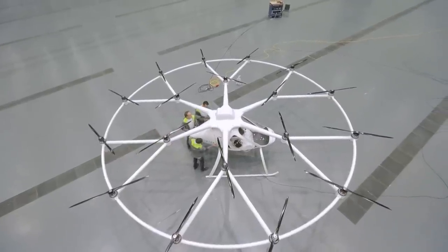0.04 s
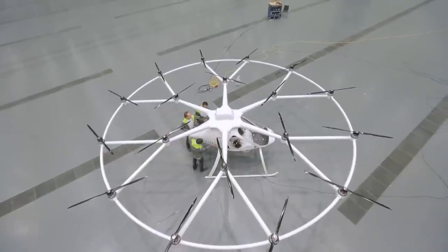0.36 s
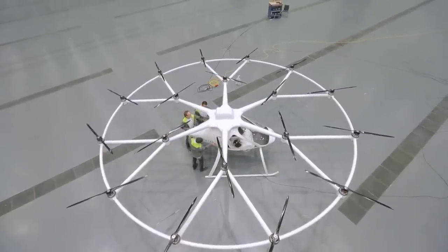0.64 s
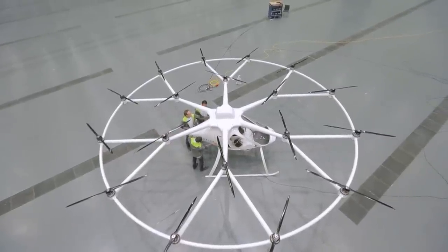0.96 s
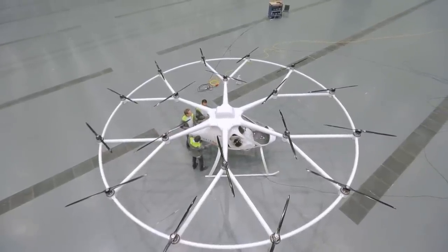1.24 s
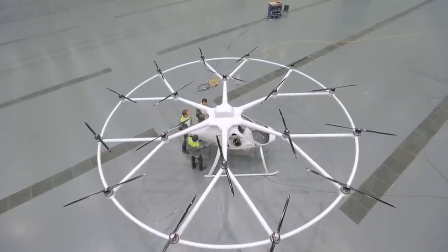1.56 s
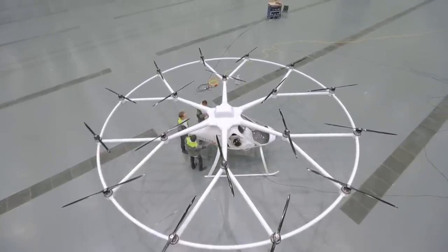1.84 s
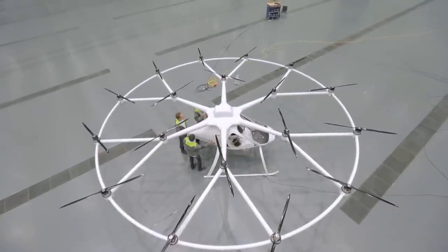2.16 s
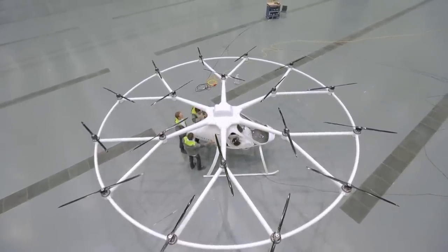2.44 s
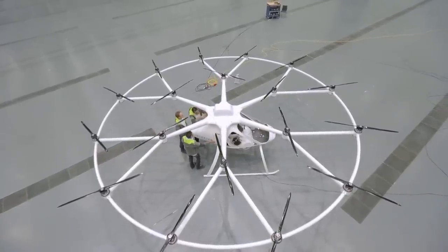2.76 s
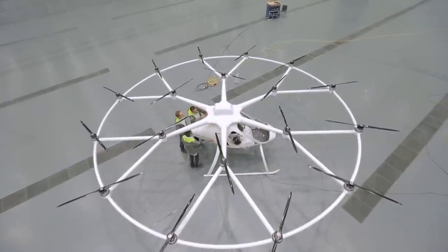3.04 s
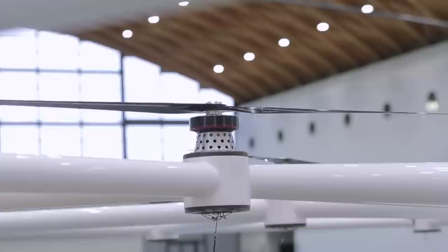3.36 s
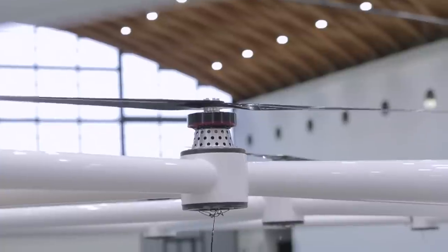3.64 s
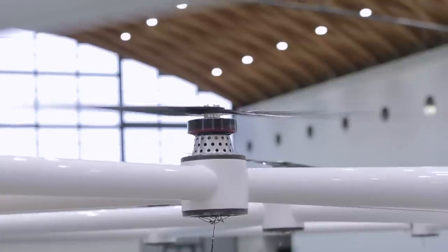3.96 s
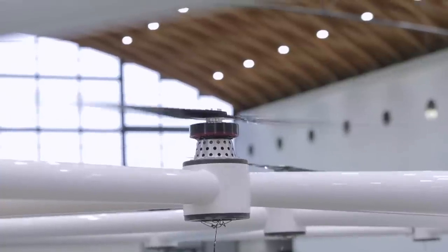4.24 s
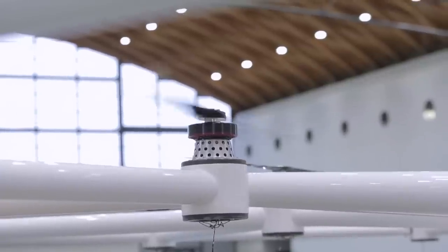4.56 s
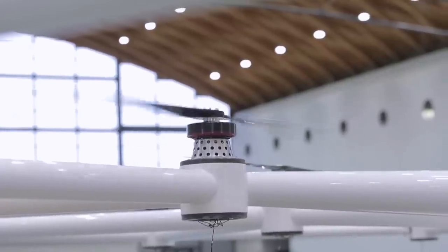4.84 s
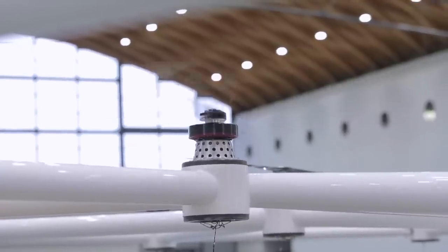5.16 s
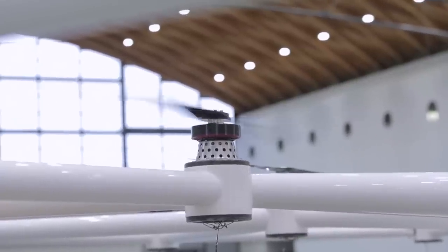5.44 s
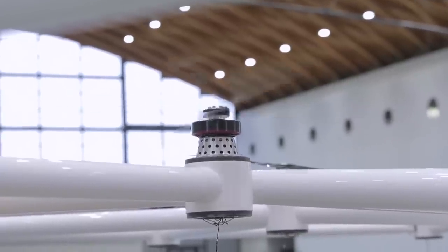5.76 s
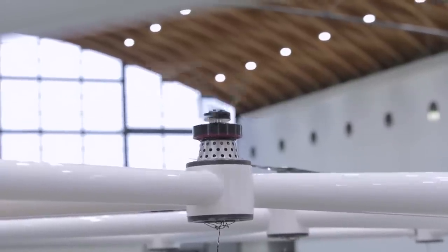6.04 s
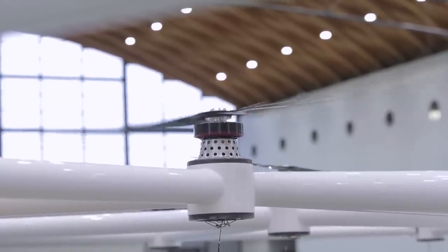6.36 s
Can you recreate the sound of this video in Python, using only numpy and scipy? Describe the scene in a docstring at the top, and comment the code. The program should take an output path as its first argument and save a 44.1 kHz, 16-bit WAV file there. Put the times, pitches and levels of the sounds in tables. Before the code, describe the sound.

A few reverberant knocks over soft ventilation hum, cut off by the loud fluttering rush of a close rotor gaining speed.

```python
"""Three hollow knocks and a few light taps ring out over the ventilation of a big quiet hall, where a
crew works at a parked multicopter: each blow excites the modes of its body, and the hall reverberates.
Then, all at once, the microphone stands in the wash of one rotor that steadily gains speed. Each blade
shoves air and turbulence at it, and the wash swells and eases. Hard blade slaps and vortex buffets
trip a limiter: the whole rush drops at once and climbs back."""
import sys
import numpy as np
from scipy import signal
from scipy.fft import rfft, irfft
from scipy.io import wavfile
from scipy.ndimage import uniform_filter1d

SR = 44100
rng = np.random.default_rng(int(sys.argv[2]) if len(sys.argv) > 2 else 0)


def transcribe(signal):
    """Save signal, clipped to [-1, 1], as a 16-bit WAV file at the path in sys.argv[1]."""
    frames = np.atleast_2d(signal).T
    limited = np.clip(frames, -1, 1)
    pcm = np.round(limited * 32767).astype(np.int16)
    wavfile.write(sys.argv[1], SR, pcm)


N = 290619
T, FREQS = np.arange(N) / SR, np.fft.rfftfreq(N, 1 / SR)
ROTOR_START_S = 3.44

# spectrum of the ventilation: f/Hz, relative density/dB
VENT_SPECTRUM = [(25, -54), (45, -6.5), (65, 4.5), (100, -3), (250, -13), (750, -17), (1000, -12),
                 (1400, -15.5), (2000, -20.5), (2900, -29.5), (5500, -26.5), (7400, -34), (9000, -25),
                 (10800, -43)]
# whine of cooling fans and electronics: f/Hz, level before the swell/dB, bandwidth/Hz
FAN_TONES = [(935, -68.5, 20), (1020, -65.5, 7.6), (1243, -68, 11), (2410, -78, 33), (4920, -78, 41),
             (5580, -76, 37)]
# swell of that whine: t/s, gain/dB
WHINE_SWELL = [(1.0, -3.5), (2.3, -2), (2.8, -3), (3.3, -8.5)]
# reverberation time of the hall: f/Hz, T60/s
HALL_T60 = [(100, 4.5), (300, 3.95), (800, 6.6), (2000, 6.7), (3000, 2.6), (10000, .35)]
# initial spectrum of the reverberant tail: f/Hz, relative density/dB
HALL_COLOUR = [(40, -23), (85, 2.5), (140, 0), (200, -1), (450, 1.5), (1000, -2.5), (2500, -0.5),
               (6000, -15)]
# modes of the hollow body: f/Hz, relative level/dB, T60/s
BODY_MODES = [(136, -2, 0.051), (193, 7.5, 0.04), (264.6, -3, 0.067), (318, -18.5, 0.019),
              (610, -12, 0.015), (1074, -12, 0.18)]
# blows on the body: t/s, thud level/dB, clack level/dB, clack cutoff/Hz, rattle decay time/s
BLOWS = [(.154, -36, -41.5, 2000, .014), (.495, -43.5, -44, 1200, 0.016), (.512, -30.5, -32, 2650, .0095),
         (.605, -48.5, -53, 4500, .011), (.697, -44, -46, 1220, .02), (.755, -30, -38.5, 1240, .022),
         (3.201, -73, -56, 3600, 0.0052)]
# pings of small metal parts: t/s, f/Hz, level/dB, T60/s
METAL_PINGS = [(.603, 2680, -50, .07), (3.202, 2900, -56, .04)]
# strength of the airflow, which drives turbulence and hiss: t/s, relative level/dB
AIRFLOW = [(3.44, -27.5), (3.54, -26.5), (3.9, -29), (4.04, -23), (4.26, -26), (4.36, -27.5), (4.46, -22),
           (4.82, -26.5), (5.04, -29), (5.15, -25), (5.52, -28.5), (5.68, -24), (5.8, -27), (6.12, -26),
           (6.28, -28.5), (6.4, -24.5), (6.59, -24)]
# air tearing past the microphone: f/Hz, relative density/dB
HISS_SPECTRUM = [(1500, -20), (4000, -2), (6000, 4.5), (8500, 5), (11300, 9.5), (13000, 5)]
# turbulence on the microphone: f/Hz, relative density/dB
WAKE_SPECTRUM = [(10, -40), (20, -0.5), (50, 2), (100, -5), (160, -7), (300, -12.5), (650, -15.5),
                 (1300, -21), (2400, -28), (4000, -36.5), (7000, -45.5), (12500, -63)]
# pressure wave of a blade: harmonic of the blade rate, relative level/dB
BLADE_HARMONICS = [(1, 5.5), (2, -5), (3, -24)]
# strength of that wave: t/s, relative level/dB
THROB_LEVEL = [(3.44, -10), (3.5, -14), (3.57, -11), (3.83, -14.5), (3.91, -20), (4.07, -11), (4.2, -13.5),
               (4.35, -12.5), (4.45, -8.5), (4.88, -13), (4.98, -12.5), (5.05, -16), (5.2, -12),
               (5.95, -11), (6.03, -18), (6.12, -10), (6.59, -14.5)]
# crests that slap the microphone extra hard: t/s, added pressure/full scale
BLADE_SLAPS = [(3.844, 0.57), (4.08, 0.21), (4.282, 0.23), (4.75, 1), (5.712, 0.68), (5.962, 0.53),
               (6.149, 0.27)]
# vortices on the microphone: t/s, suction/full scale, rasp level/dB, rasp f/Hz, rasp half-length/s
VORTICES = [(3.547, 0.63, -21, 380, .014), (3.723, 0.5, -18.5, 205, 0.0045), (3.826, 0.15, -23, 343, 0.014),
            (4.404, 0.88, -18.5, 293, 0.013), (4.478, 2.03, -10, 151, .007), (4.995, 0.77, -30, 400, .003),
            (5.067, .05, -22.5, 274, 0.003), (5.163, 0.23, -13, 368, 0.0032),
            (5.308, 0.13, -23.5, 435, 0.021), (5.362, 0.4, -16.5, 372, 0.0028),
            (6.051, 0.57, -25, 187, 0.002), (6.19, 0.67, -21, 212, 0.013), (6.425, 0.088, -22, 430, 0.0073)]


def amp(db):
    """Amplitude ratio of a level in decibels."""
    return 10 ** (np.asarray(db) / 20)


def unit(x):
    """Normalisation to rms 1."""
    return x / np.sqrt(np.mean(x ** 2) + 1e-20)


def read(points, hz):
    """Interpolation on a logarithmic frequency axis."""
    f, value = np.transpose(points)
    return np.interp(np.log(hz + 1), np.log(f + 1), value)


def curve(points):
    """Linear interpolation in time."""
    return np.interp(T, *np.transpose(points))


def add(mix, s, sound):
    """Superposition of a sound beginning at time s."""
    part = mix[max(round(s * SR), 0):][:len(sound)]
    part += sound[:len(part)]


def lowpass(x, hz):
    """Second-order Butterworth low-pass."""
    return signal.sosfilt(signal.butter(2, hz, fs=SR, output="sos"), x)


def band(x, lo_hz, hi_hz):
    """Steep Butterworth band-pass."""
    return signal.sosfilt(signal.butter(4, [lo_hz, hi_hz], "band", fs=SR, output="sos"), x)


def below(x, hz):
    """Zero-phase low-pass."""
    return irfft(rfft(x) / (1 + (FREQS / hz) ** 4), N)


def noise(spectrum):
    """Spectrally shaped Gaussian noise of rms 1."""
    return unit(irfft(rfft(rng.standard_normal(N)) * amp(read(spectrum, FREQS)), N))


def drift(hz):
    """Random fluctuation of rms 1, mostly slower than hz."""
    return unit(below(rng.standard_normal(N), hz))


def ventilation(rumble_db=-54):
    """Broadband flow noise with fan tones, which random modulation widens into narrow bands."""
    fans = np.zeros(N)
    for hz, db, width in FAN_TONES:
        angle = 2 * np.pi * hz * T
        fans += amp(db) * unit(drift(width / 2) * np.cos(angle) + drift(width / 2) * np.sin(angle))
    return amp(rumble_db) * noise(VENT_SPECTRUM) + fans * amp(curve(WHINE_SWELL))


def hall(x, wet_db=-6, boom_db=-52):
    """Reverberation: a diffuse field decays exponentially, and absorption takes the treble first."""
    hz, t, spectra = signal.stft(rng.standard_normal(N), SR, nperseg=512)
    decay_db = read(HALL_COLOUR, hz)[:, None] - 60 * t / read(HALL_T60, hz)[:, None]
    tail = signal.istft(spectra * amp(decay_db), SR, nperseg=512)[1][:N]
    boom = band(lowpass(tail, 400), 58, 2500)  # an earlier blow still hangs in the air
    boom /= np.std(boom[:SR // 4])
    tail *= np.sqrt(2000 / SR) / np.linalg.norm(lowpass(tail, 1000))  # about unit gain below 1 kHz
    return x + amp(wet_db) * signal.fftconvolve(x, tail)[:N] + amp(boom_db) * boom


def knocks(thud_hz=600, panel_gain=1.64, shudder_s=0.011):
    """Impact excitation: rattling contacts radiate a clack and drive the body's modes to a thud."""
    out, t = np.zeros(N), T[:SR // 2]
    ring = sum(amp(db - 60 * t / t60) * np.cos(2 * np.pi * hz * t) for hz, db, t60 in BODY_MODES)
    rebounds = [(s + 1.15 * rattle_s, thud_db - 3, clack_db - 4, clack_hz, rattle_s)
                for s, thud_db, clack_db, clack_hz, rattle_s in BLOWS]
    for s, thud_db, clack_db, clack_hz, rattle_s in list(BLOWS) + rebounds:
        chatter = rng.choice([-1, 1], len(t))
        shudder = chatter * np.exp(-t / (rattle_s + shudder_s))
        thud = lowpass(signal.fftconvolve(shudder, ring)[:len(t)], thud_hz)
        panel = panel_gain * band(rng.standard_normal(len(t)), 460, 1470)  # a thin panel's colour
        contacts = (chatter + panel) * np.exp(-t / rattle_s)
        clack = band(lowpass(contacts, clack_hz), 610, 11000)
        add(out, s, amp(thud_db) * thud / np.std(thud[:SR // 40]))
        add(out, s, amp(clack_db) * clack / np.std(clack[:SR // 100]))
    for s, hz, db, t60 in METAL_PINGS:
        add(out, s, amp(db - 60 * t / t60) * np.sin(2 * np.pi * hz * t))
    return band(out, 66, 13500)


def hiss(angle, fade_db_per_s=1.86):
    """Flow noise, modulated: air hisses as a blade arrives and again halfway to the next."""
    level_db = curve(AIRFLOW) - 21 - fade_db_per_s * (T - ROTOR_START_S)
    chop_db = 2.5 * np.cos(2 * angle) - np.cos(angle)
    return noise(HISS_SPECTRUM) * amp(level_db + chop_db + 1.5 * drift(150))


def wake(angle, large_lump_db=1.1, fine_lump_db=0.58, chop_db=1.5):
    """Intermittent turbulence behind each blade: large eddies come in lumps, fine ones less so."""
    lumps, air = drift(99), noise(WAKE_SPECTRUM)
    large = below(air, 750)
    eddies = large * amp(large_lump_db * lumps - 1.14) + (air - large) * amp(fine_lump_db * lumps)
    return eddies * amp(curve(AIRFLOW) + 6 + chop_db * np.cos(angle + .5))


def throb(angle, cusp_spread_db=2):
    """Periodic blade pressure: the tip vortex sharpens each crest to a cusp of varying height."""
    wave = unit(sum(amp(db) * np.sin(k * angle) for k, db in BLADE_HARMONICS))
    cusp = np.exp(-9 * abs(np.sin((angle - 1.1) / 2))) * amp(cusp_spread_db * drift(14.6))
    return unit(wave + cusp - cusp.mean()) * amp(curve(THROB_LEVEL) - 4)


def buffets(slap_s=0.0014, suction_s=0.0011):
    """Pressure transients: a slap is a smooth spike, a vortex a spike of suction in coarse noise."""
    out, t = np.zeros(N), T[:SR // 10] - 0.05
    for s, push in BLADE_SLAPS:
        add(out, s + t[0], push * np.exp(-(t / slap_s) ** 2))
    for s, suction, rasp_db, rasp_hz, rasp_s in VORTICES:
        burst = np.exp(-(t / rasp_s) ** 2)
        rasp = band(lowpass(rng.standard_normal(len(t)), rasp_hz), rasp_hz, 3700) * burst
        rasp *= amp(rasp_db) * np.linalg.norm(burst) / np.linalg.norm(rasp)
        add(out, s + t[0], rasp - suction * np.exp(-(t / suction_s) ** 2))
    return out


def rotor(blade_hz=28.5, spin_up_hz_per_s=1.46, first_blade_s=0.013, jitter_passes=0.011):
    """Uniform acceleration: the rising blade-passing frequency paces throb, wake and hiss."""
    t = T - ROTOR_START_S
    passes = blade_hz * (t - first_blade_s) + spin_up_hz_per_s * t ** 2 / 2
    angle = 2 * np.pi * (passes + jitter_passes * drift(11.3))
    return throb(angle) + wake(angle) + hiss(angle)


def scene():
    """Two sound fields in turn: the reverberant hall, then abruptly the rotor's near field."""
    quiet = hall(knocks()) + ventilation()
    wash = rotor() + buffets()
    crossfade = np.clip((T - ROTOR_START_S) / 0.001, 0, 1)
    return ((1 - crossfade) * quiet + crossfade * wash)[None]


def record(dry, ceiling_db=-5, recovery_db_per_s=45, cutoff_hz=12839):
    """Peak limiting: the gain falls at once and recovers slowly; a steep low-pass follows."""
    over_db = np.maximum(20 * np.log10(abs(dry[0]) + 1e-9) - ceiling_db, 0)
    release_db = T * recovery_db_per_s
    held_db = np.maximum.accumulate(over_db + release_db) - release_db
    duck_db = uniform_filter1d(held_db, size=64)
    band_limit = signal.firwin(1023, cutoff_hz, window=("kaiser", 9), fs=SR)
    return signal.oaconvolve(dry * amp(-duck_db), band_limit[None], "same")


dry = scene()
out = record(dry)
transcribe(out)
```